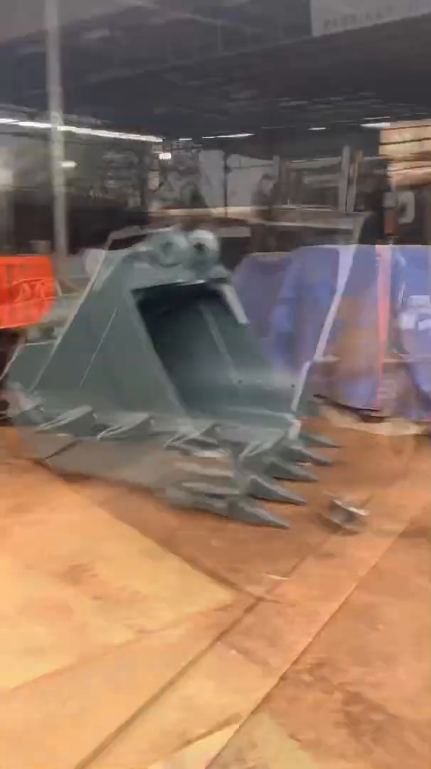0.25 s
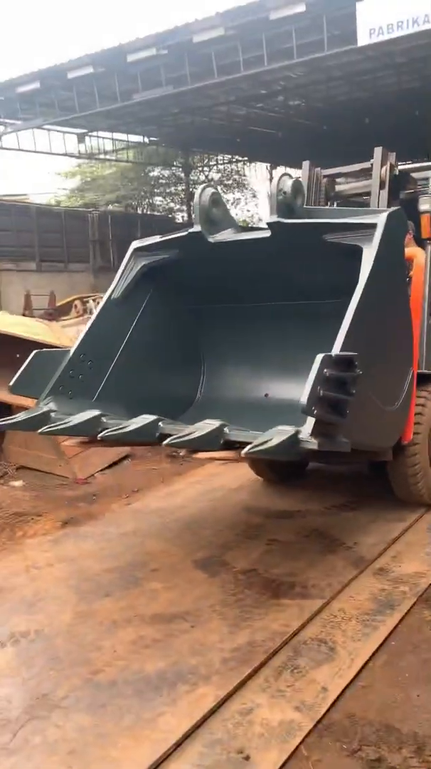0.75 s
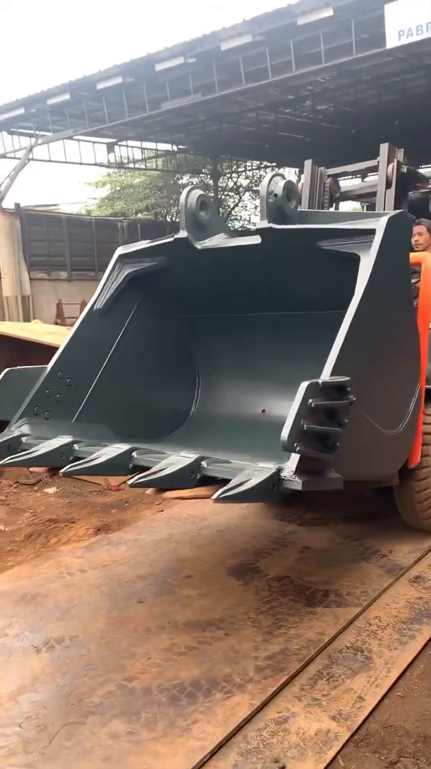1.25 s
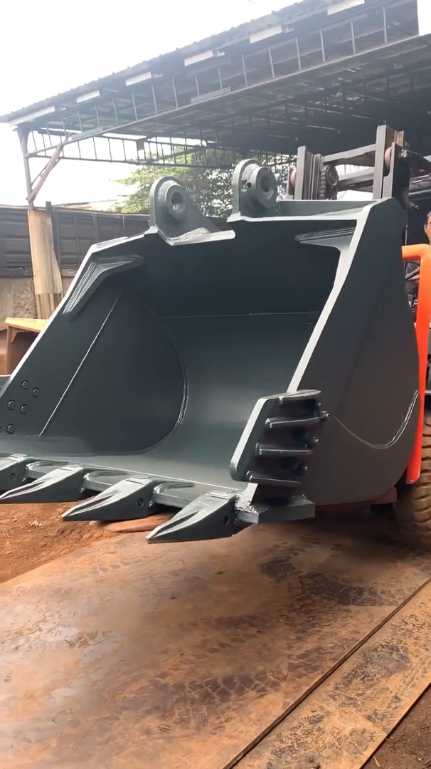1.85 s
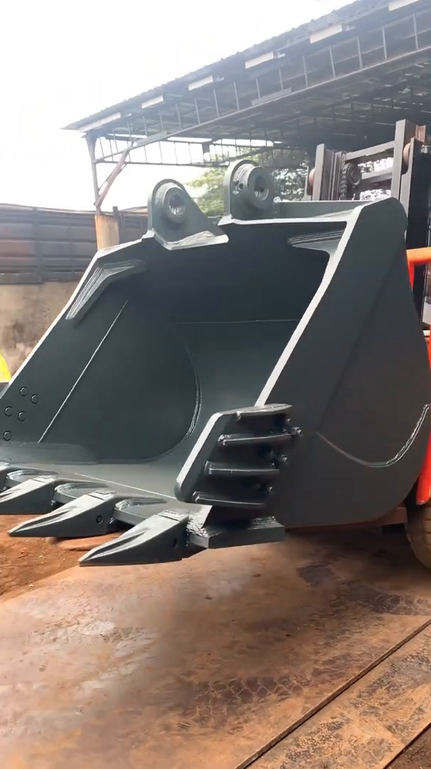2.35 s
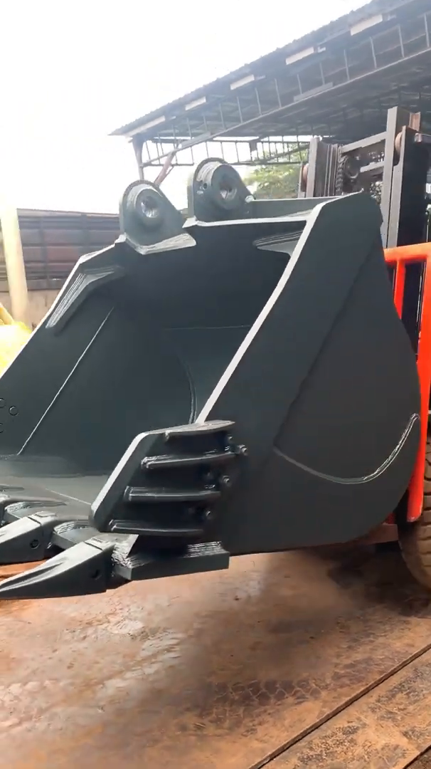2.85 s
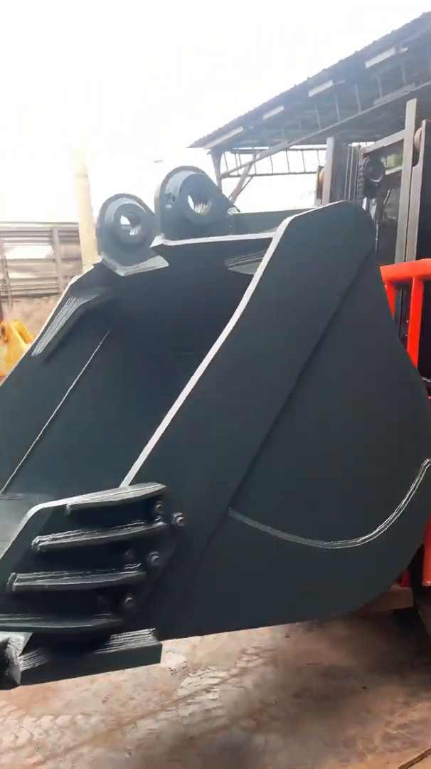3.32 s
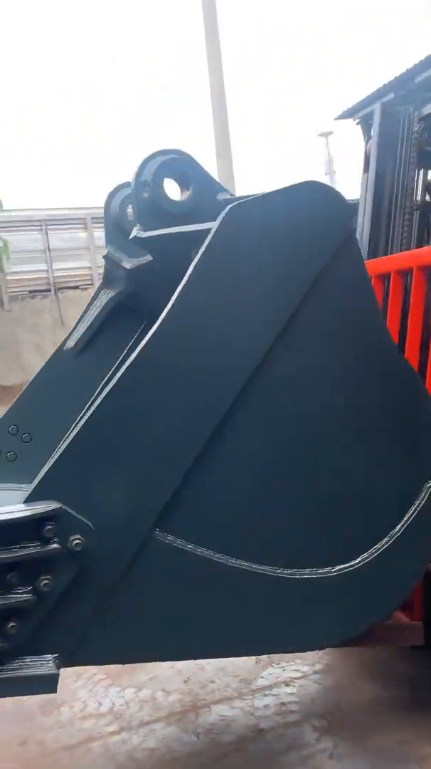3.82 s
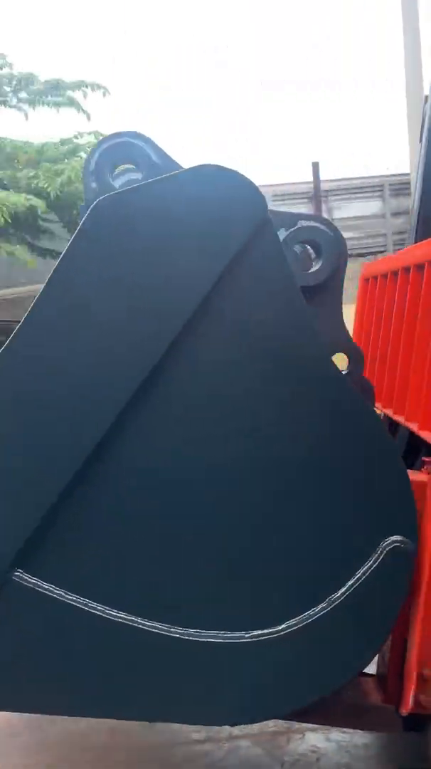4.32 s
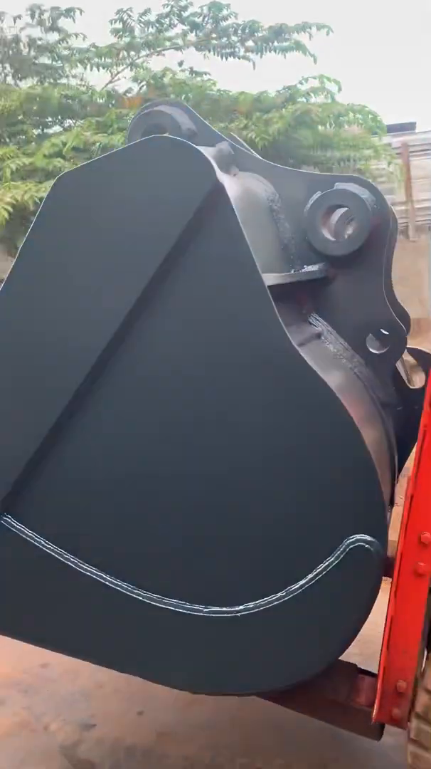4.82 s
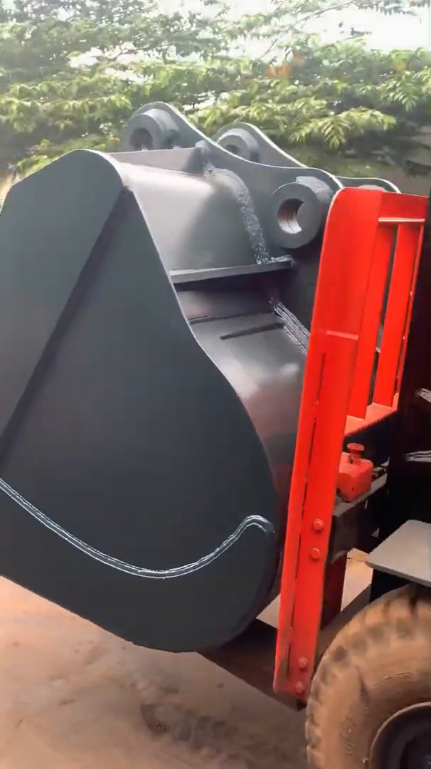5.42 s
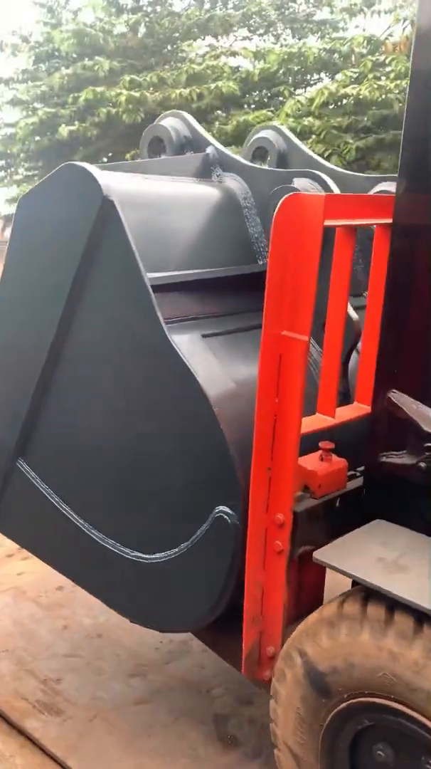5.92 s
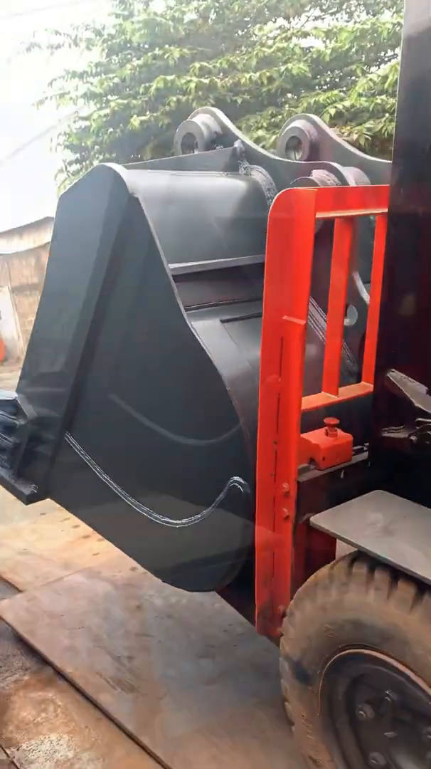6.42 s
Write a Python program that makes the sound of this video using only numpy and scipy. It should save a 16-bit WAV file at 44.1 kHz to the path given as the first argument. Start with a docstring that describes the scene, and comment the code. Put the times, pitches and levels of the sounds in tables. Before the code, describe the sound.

A diesel forklift clatters and drones steadily through a workshop yard, floor plates slapping underneath while a heavy steel load rattles, groans and clanks hard.

```python
"""A diesel forklift drives past in a workshop yard, carrying a steel excavator bucket on its forks.
Noise shaken by each firing makes the engine clatter; tones at its even orders make the exhaust drone.
Loose floor plates slap and boom under the tyres as decaying partials and a sagging note.
The bucket chatters in noise bursts, clangs in steel modes, groans on the forks and slips in brief tones.
Two microphone ports hear it, with the short answer of a tin roof and walls around the blows."""
import sys
import numpy as np
from scipy import signal
from scipy.fft import rfft, irfft, next_fast_len
from scipy.io import wavfile
from scipy.ndimage import uniform_filter1d, map_coordinates

SR = 44100
rng = np.random.default_rng(int(sys.argv[2]) if len(sys.argv) > 2 else 0)


def put_to_file(sound):
    """Save the sound as 16-bit audio at rate SR, in the file named by the first command-line argument."""
    columns = np.atleast_2d(sound).T  # one column per channel
    safe = np.clip(columns, -1, 1)
    whole_steps = np.round(safe * 32767)
    wavfile.write(sys.argv[1], SR, whole_steps.astype(np.int16))


N = 294147


def amp(db):
    """Decibels to gain."""
    return 10 ** (np.asarray(db) / 20)


def unit(x):
    """Scale to rms 1."""
    return x / np.sqrt(np.mean(x ** 2) + 1e-20)


def along(points, hz):
    """Read (Hz, value) points on a log frequency axis."""
    f, v = np.transpose(points)
    return np.interp(np.log(hz + 1), np.log(f + 1), v)


def curves(rows):
    """One value per sample for each column after the time."""
    s, *cols = np.transpose(rows)
    return [np.interp(np.arange(N) / SR, s, c) for c in cols]


def wobble(rate):
    """A smooth random curve, rate knots a second."""
    knots = rng.standard_normal(int(N * rate / SR) + 4)
    return map_coordinates(knots, [np.arange(N) * rate / SR])


def swell(s, length, rise, fall):
    """An envelope from 0 to 1: it rises from time s, holds, and falls once its length is over."""
    t = np.arange(N) / SR - s
    return np.clip(t / rise, 0, 1) * np.clip(1 - (t - length) / fall, 0, 1)


def filtered(x, response):
    """x times a complex response of frequency."""
    size = next_fast_len(N + SR // 2)
    return irfft(rfft(x, size) * response(np.fft.rfftfreq(size, 1 / SR)), size)[..., :N]


def coloured(spectrum, gate=1):
    """Gated noise of rms 1 with the given spectrum."""
    noise = gate * rng.standard_normal(N)
    return unit(filtered(noise, lambda hz: amp(along(spectrum, hz))))


def tone(hz):
    """A sine of rms 1 that follows a pitch curve."""
    return np.sqrt(2) * np.sin(2 * np.pi * (np.cumsum(hz) / SR + rng.random()))


def narrow(hz, width):
    """A fuzzy resonance of rms 1: random sidebands around a pitch curve."""
    phase = 2 * np.pi * np.cumsum(hz) / SR
    return unit(wobble(width) * np.cos(phase) + wobble(width) * np.sin(phase))


def shimmer(x, depth_db):
    """Echoes between steel sheets raise narrow peaks that drift, drawn here as a smoothed random field."""
    z = signal.stft(x, nperseg=2048)[2]
    across_pitch = uniform_filter1d(rng.standard_normal(z.shape), size=2, axis=0)
    field = uniform_filter1d(across_pitch, size=18, axis=1)
    return unit(signal.istft(z * amp(depth_db * unit(field)), nperseg=2048)[1][:N])


def add(track, s, sound):
    """Mix a sound into a track at time s."""
    part = track[round(s * SR):][:len(sound)]
    part += sound[:len(part)]


# Decay of the roof and walls. Each row: frequency in Hz, time to fall by 60 dB in seconds.
YARD_DECAY = [(100, 0.58), (1000, 0.28), (4000, 0.059), (14000, 0.1)]


def yard(x):
    """The diffuse answer of roof and walls: decaying noise whose fall time depends on pitch."""
    hz, t, z = signal.stft(rng.standard_normal(SR // 2), SR, nperseg=256)
    t60 = along(YARD_DECAY, hz)[:, None]
    fading = z * amp(-60 * t / t60) / np.sqrt(t60)  # evens out the energy of long and short decays
    tail = signal.istft(fading, SR, nperseg=256)[1]
    return signal.fftconvolve(x, unit(tail) / np.sqrt(len(tail)))[:N]


HUM_HZ, HUM_DB = 64.5, -39.5  # between its swells
PUMP_HZ = 1552
SWELL_RISE_S, SWELL_FALL_S = 0.05, 0.3
# The low hum swells. Each row: start in seconds, length in seconds, gain in dB.
HUM_SWELLS = [(0.601, 1.33, 7.5), (2.152, 0.29, 12.5), (3.049, 0.14, 11.5), (3.36, 0.34, 6.5),
              (4.2, 0.24, 5), (5.1, 1.1, 3)]
# A tone beside the hum makes it throb. Each row: start in seconds, length in seconds, level in dB, pitch in Hz.
THROBS = [(1.661, 0.38, -34.5, 73), (5.15, 0.5, -36, 75.8)]
# The hydraulic pump whines. Each row: start in seconds, length in seconds, level in dB.
PUMP_RUNS = [(.42, 1.64, -40), (5.769, 0.27, -33.5)]


def hums():
    """A low hum beats with neighbouring tones over soft rumbling noise; the pump is a thin resonance."""
    span = lambda s, length: swell(s, length, SWELL_RISE_S, SWELL_FALL_S)
    hum_db = HUM_DB + sum(db * span(s, length) for s, length, db in HUM_SWELLS)
    hum = amp(hum_db + 0.63 * wobble(9.7)) * tone(HUM_HZ * (1 + 0.0033 * wobble(5.0)))
    throb = sum(amp(db) * span(s, length) * tone(np.full(N, hz)) for s, length, db, hz in THROBS)
    rumble_spectrum = [(20, -35), (40, -34), (52, -8), (75, -2), (110, -3.0), (250, -24), (700, -90)]
    rumble = amp(-43.5 + 4.5 * wobble(2.94)) * coloured(rumble_spectrum)
    pump_level = sum(amp(db) * span(s, length) for s, length, db in PUMP_RUNS)
    whine = pump_level * narrow(np.full(N, PUMP_HZ), width=50)
    return hum + throb + rumble + whine


FLANK_S, FLANK_TURN_S = 4.73, 0.56  # middle of the turn, and its time scale


def flank():
    """From 0 to 1 as the side of the truck comes round to the microphone."""
    return .5 + .5 * np.tanh((np.arange(N) / SR - FLANK_S) / FLANK_TURN_S)


SOFTEN_S, SOFTEN_LENGTH_S = 6.09, 0.28


def softened():
    """From 0 to 1 as the truck moves past and the engine sound softens."""
    return np.clip((np.arange(N) / SR - SOFTEN_S) / SOFTEN_LENGTH_S, 0, 1)


DIP_S, DIP_LENGTH_S, DIP_FALL_S, DIP_RECOVER_S = 4.593, 0.23, 0.14, 0.17


def dip():
    """From 0 to 1 and back while the level dips briefly after the last clank."""
    return swell(DIP_S, DIP_LENGTH_S, DIP_FALL_S, DIP_RECOVER_S)


# How hard the engine works. Each row: time in seconds, level change in dB.
LOAD = [(0, -3), (.34, -3.5), (.7, -1), (1.4, -1), (1.76, 1.4), (2.05, -1), (2.37, 1.5), (2.75, -0.5),
        (3.1, -2), (3.42, 3), (4, -1), (4.45, 3), (5, -1), (5.2, 1), (5.5, 0), (5.95, 2), (6.35, -1),
        (6.67, 0.5)]


def working_db(flank_db, dip_db, load_share=1):
    """A layer's level change with the load, the passing flank and the brief dip."""
    return load_share * curves(LOAD)[0] + flank_db * flank() + dip_db * dip()


# Layer levels in dB before the changes of working_db and softened.
BODY_DB, CLATTER_DB, FAN_DB, HISS_DB = -25.5, -25.5, -39.5, -41
# What the turned flank, the dip and the softening at the end add, in dB.
FLANK_BODY_DB, FLANK_CLATTER_DB, FLANK_FAN_DB, FLANK_HISS_DB = -3, -0.35, 4, 1.7
DIP_BODY_DB, DIP_CLATTER_DB, DIP_HISS_DB = -10, -3, -7.5  # the fan dips with the clatter
SOFTEN_BODY_DB, SOFTEN_CLATTER_DB, SOFTEN_HISS_DB = -2, -2.5, -.7
# Spectrum of the hiss. Each row: frequency in Hz, density in dB per Hz.
AIR = [(20, -14), (1000, -14), (4000, -27), (6000, 3.5), (8000, 5), (10500, 1.5), (15000, 3.5), (16000, 0)]


def hiss():
    """Coloured noise with a fast flutter: a faint hiss above the engine."""
    level_db = HISS_DB + working_db(FLANK_HISS_DB, DIP_HISS_DB, load_share=0.17) + SOFTEN_HISS_DB * softened()
    return amp(level_db + 0.85 * wobble(13.0)) * coloured(AIR, gate=amp(1.3 * wobble(250)))


def fan():
    """The cooling fan whooshes in one broad resonance."""
    fan_hz = 650
    level_db = FAN_DB + working_db(FLANK_FAN_DB, DIP_CLATTER_DB)
    return amp(level_db + wobble(6.3)) * narrow(np.full(N, fan_hz), width=220)


BOOM_HZ, BOOM_SAG_HZ_PER_S = 175.4, 53  # starting pitch and its fall
BOOM_DELAY_S, BOOM_RISE_S, BOOM_HOLD_S, BOOM_FALL_S = .01, 0.02, 0.049, 0.0065  # hold includes the rise
BOOM_TAIL_DB, BOOM_TAIL_T60_S = -6, 0.78
PLATE_RING_HZ, PLATE_RING_DB, PLATE_RING_T60_S = 522, -13.5, 1.4  # a faint after-ring, re the boom
# The plate buzzes against the ground as it bends. Each row: multiple of the boom, level in dB.
BOOM_PARTIALS = [(1, 0), (2, -15.5), (3, -15), (4, -19)]
# Plates rock under a tyre. Each row: start in seconds, slap level in dB, slap pitch in Hz, boom level in dB.
PLATES = [(.381, -9.5, 502, -17.5), (.877, -11, 510, -16), (4.243, -13.5, 344, -31),
          (4.828, -15.5, 423, -35), (5.225, -17, 431, -34)]


def plates():
    """A plate slaps down with a gritty knock, booms and buzzes until the tyre pins it, and leaves a tail."""
    out, t = np.zeros(N), np.arange(SR // 2) / SR
    slap_partials = [(.64, -6), (1, 2.5), (2.2, -3), (2.9, -8.5)]  # (multiple of the slap pitch, dB)
    grit_spectrum = [(90, -31), (200, -10.0), (500, -2.0), (800, 0.5), (1800, -0.5), (3500, -40.0)]
    for s, slap_db, hz, boom_db in PLATES:
        knock = sum(amp(db) * np.sin(2 * np.pi * hz * ratio * t) for ratio, db in slap_partials)
        grit = coloured(grit_spectrum)[:len(t)]
        slap = knock * amp(-60 * t / 0.079) + 0.32 * grit * amp(-60 * t / 0.24)
        slap = slap * (1 - np.exp(-t / 0.003))
        bend = swell(BOOM_DELAY_S, BOOM_HOLD_S, BOOM_RISE_S, BOOM_FALL_S)[:len(t)]
        tail = amp(BOOM_TAIL_DB - 60 * t / BOOM_TAIL_T60_S) * (1 - np.exp(-t / 0.022))
        phase = 2 * np.pi * (BOOM_HZ - BOOM_SAG_HZ_PER_S * t / 2) * t + 0.23 * wobble(95)[:len(t)]
        buzz = sum(amp(db) * np.sin(k * phase + 2 * np.pi * rng.random()) for k, db in BOOM_PARTIALS)
        boom = buzz * (bend + tail) * amp(1.2 * wobble(108)[:len(t)])
        ring = np.sin(2 * np.pi * PLATE_RING_HZ * t) * amp(PLATE_RING_DB - 60 * t / PLATE_RING_T60_S)
        add(out, s, amp(slap_db) * slap + amp(boom_db) * (boom + ring))
    return out


GROAN_RISE_S, GROAN_FALL_S = 0.032, .1
GROAN_WAVER, GROAN_TONE_DB = .013, -3  # wander as a share of the pitch; clear tone re the rough part
# The load groans on the forks. Each row: start in seconds, length in seconds, level in dB,
# starting pitch in Hz, roughness width in Hz, sag in Hz per second.
GROANS = [(3.356, 0.13, -32, 441, 47, 3), (3.563, 0.17, -30, 373, 30.05, 23),
          (3.8, 0.16, -33.5, 365, 35.9, 27), (4.04, 0.13, -29, 365, 51.06, 57),
          (4.216, 0.18, -23.5, 348, 36, 229), (4.807, .08, -29.5, 425, 70, 195)]


def groan():
    """The heavy load rubs on the forks: a rough resonance and a tone that waver and sag in pitch."""
    t, out = np.arange(N) / SR, np.zeros(N)
    waver = 1 + GROAN_WAVER * wobble(16)
    for s, length, db, hz, width, sag in GROANS:
        pitch = waver * (hz - sag * np.clip(t - s, 0, length + GROAN_FALL_S))
        voice = unit(narrow(pitch, width) + amp(GROAN_TONE_DB) * tone(pitch))
        out += amp(db) * swell(s, length, GROAN_RISE_S, GROAN_FALL_S) * voice
    return out


CLANK_SCRAPE_DB, RATTLE_SCRAPE_DB = -14, -26.5  # re the blow
# The bucket clanks hard on the forks and rebounds. Each row: time in seconds, blow level in dB,
# thud trim in dB, crack level in dB, ring level in dB, pitch that rings most in Hz.
CLANKS = [(2.595, -9.5, -3, -20, -14.5, 2833), (2.645, -15, 0, -40, -31, 2460),
          (3.602, -8, -11, -22, -23, 1340), (3.644, -14.5, -10, -38, -25, 1350),
          (4.444, -5.5, -8, -21, -22.5, 1250), (4.489, -11.5, -7, -40, -22, 917),
          (4.556, -8, -13, -35, -17, 876), (4.592, -11, -20, -42, -18, 2500)]
# The bucket knocks loosely over bumps. Each row: time in seconds, blow level in dB,
# thud trim in dB, ring level in dB, pitch that rings most in Hz.
RATTLES = [(.765, -13.5, -21, -35, 2600), (.8, -13.5, -21, -31, 2603), (.838, -13, -12, -28, 2480),
           (1.248, -26, -3, -29, 1213), (3.205, -26, -10, -38, 2480), (3.24, -13.5, -7, -26.5, 2480),
           (3.266, -11, -2, -25, 790), (3.306, -17, -8, -25, 2480), (3.345, -13.5, 0, -23, 820),
           (3.372, -10, -15, -23, 2950), (3.405, -16, 1, -33, 820), (3.438, -16, -6, -25, 1350),
           (3.473, -26, 1, -38, 820), (3.524, -15, -1.5, -23, 2460), (3.549, -15, -4, -28, 2480),
           (4.252, -11.5, -3, -34, 2500), (4.388, -15.5, -2, -26, 1450), (4.826, -16, -4, -40, 2500),
           (4.863, -16.5, -7, -29, 2500), (5.116, -15, 0, -29.5, 1370)]


def contacts():
    """Every touch of bucket and forks: (s, blow dB, thud trim dB, scrape dB)."""
    return ([(s, db, thud_db, CLANK_SCRAPE_DB) for s, db, thud_db, *_ in CLANKS]
            + [(s, db, thud_db, RATTLE_SCRAPE_DB) for s, db, thud_db, *_ in RATTLES])


def strikes():
    """The blows that ring the shell: (s, ring dB, Hz that rings most)."""
    return [(s, db, hz) for s, *_, db, hz in CLANKS + RATTLES]


IMPACTS_PER_S, IMPACT_SPREAD_DB, IMPACT_DECAY_S = 260, 1, .003
IMPACT_RUB = 0.53  # power of the rub re the mean power of the impacts


def hail():
    """The envelope, of rms 1, of irregular tiny impacts over a steady rub."""
    spread_db = IMPACT_SPREAD_DB * np.clip(rng.standard_normal(N), -1.5, 1.5)
    hits = (rng.random(N) < IMPACTS_PER_S / SR) * amp(spread_db) ** 2
    power = signal.lfilter([1], [1, -np.exp(-1 / (IMPACT_DECAY_S * SR))], hits)
    return unit(np.sqrt(power / power.mean() + IMPACT_RUB))


CONTACT_SHIMMER_DB = 3.5
# Spectra of steel contact, dull thud and bright scrape. Each row: frequency in Hz, density in dB per Hz.
CONTACT = [(100, -36), (400, -13), (850, 2.5), (1250, -3.5), (1700, -2), (2700, -4), (3300, -5.5),
           (4200, -12), (6200, -19), (9000, -23.5), (16000, -44)]
THUD = [(40, -32), (90, 9.5), (230, 6.5), (380, 10.5), (600, 0.5), (1500, -46)]
SCRAPE = [(1500, -30), (3000, 8), (6200, 16.5), (9000, 8.5), (15500, -22)]


def chatter():
    """The bucket lands on the forks in bursts of contact, thud and scrape noise that die away."""
    t = np.arange(SR // 2) / SR
    burst = lambda t60, rise: (1 - np.exp(-t / rise)) * amp(-60 * t / t60)
    contact, thud, scrape = np.zeros((3, N))  # powers, so that overlapping bursts add
    for s, db, thud_db, scrape_db in contacts():
        start = s - .009
        add(contact, start, (amp(db - 6.5) * burst(t60=0.27, rise=0.0069)) ** 2)
        add(thud, start, (amp(db + thud_db - 2.5) * burst(t60=0.29, rise=0.016)) ** 2)
        add(scrape, start, (amp(db + scrape_db) * burst(t60=0.24, rise=0.013)) ** 2)
    grain = hail()
    steel = shimmer(coloured(CONTACT, grain), CONTACT_SHIMMER_DB)
    landing = np.sqrt(contact) * steel + np.sqrt(thud) * coloured(THUD)
    return landing + np.sqrt(scrape) * coloured(SCRAPE, grain)


# Modes of the bucket shell. Each row: frequency in Hz, level in dB, time to fall by 60 dB in seconds
# before the forks' damping.
STEEL = [(790, -2.5, .8), (845, -5, 0.97), (878, 0, 1.2), (923, -3, 0.68), (1008, 1, 0.34),
         (1206, 2.5, 0.71), (1328, 2, 0.63), (1440, -4, .73), (1870, 1, 0.48), (2194, -1.5, 0.32),
         (2505, -2.5, .45), (2660, -4, 0.36), (2734, -2.5, 0.3), (2954, -1.5, 0.62), (3240, -5, .15),
         (4800, -23, .3), (6160, -19, .3)]


def clangs():
    """Each blow favours the modes of the spot it strikes; the forks damp and roughen the ring."""
    out, t = np.zeros(N), np.arange(SR) / SR
    damping = 0.45 + np.exp(-t / 0.02)
    for s, db, focus_hz in strikes():
        for hz, level, t60 in STEEL:
            spot_db = max(-22 * abs(np.log2(hz / focus_hz)), -13)
            # a random walk of the phase, in cycles, roughens the mode
            drift = rng.random() + 2.0 * np.cumsum(rng.standard_normal(len(t))) / np.sqrt(SR)
            decay = amp(level + spot_db + rng.normal(0, 2.0) - 60 * t / t60)
            ring = np.sin(2 * np.pi * (hz * t + drift)) * decay
            add(out, s, amp(db) * ring * damping * (1 - np.exp(-t / 0.0024)))
    return out


def cracks():
    """An edge skids for a moment and gives a bright, gritty crack of noise."""
    t = np.arange(SR // 4) / SR
    level = np.zeros(N)
    for s, _, _, db, *_ in CLANKS:
        add(level, s - .002, amp(db) * (1 - np.exp(-t / 0.0038)) * amp(-60 * t / 0.11))
    spectrum = [(1500, -12), (3000, 7), (3900, 3), (4800, -3), (6200, 13), (9000, 0), (15500, 3)]
    return level * coloured(spectrum, gate=amp(1.1 * wobble(600)))


SLIP_RISE_S, SLIP_FALL_S = 0.0056, 0.011
SLIP_ROUGHNESS, SLIP_JUDDER_HZ = 0.19, 260.4  # judder depth; its knots per second
# The bucket slips on the forks. Each row: start in seconds, length in seconds, level in dB, pitch in Hz.
SLIPS = [(.834, 0.011, -29, 2485), (2.596, .01, -26, 870), (3.27, 0.0083, -24, 824),
         (3.372, 0.028, -27.5, 830), (3.402, .016, -21.5, 438), (3.527, .012, -25, 2350),
         (3.6, 0.018, -28.5, 1323), (3.64, .02, -27, 1330), (4.448, .016, -19.5, 874),
         (4.462, 0.0088, -21.5, 1280), (4.485, 0.027, -18, 898), (4.513, 0.019, -26, 2560),
         (4.564, 0.024, -17.5, 879), (4.59, 0.0083, -21, 2490), (4.618, 0.065, -31.5, 1432)]


def slips():
    """A slip drives one mode of the shell, with a judder, and stops when the steel grips again."""
    out, t = np.zeros(N), np.arange(SR // 8) / SR
    judder = np.array([wobble(SLIP_JUDDER_HZ), wobble(SLIP_JUDDER_HZ)]) * SLIP_ROUGHNESS
    for s, length, db, hz in SLIPS:
        size, bend = judder[:, round(s * SR):][:, :len(t)]
        sing = np.sqrt(2) * (1 + size) * np.sin(2 * np.pi * (hz * t + rng.random()) + bend)
        add(out, s, amp(db) * swell(0, length, SLIP_RISE_S, SLIP_FALL_S)[:len(t)] * sing)
    return out


DRONE_FALL_S = 0.17
DRONE_OVERTONE_DB, DRONE_WAVER = -21, 0.0078  # each overtone re the note; wander as a share of the pitch
# Low notes from the loaded truck. Each row: start in seconds, length in seconds, level in dB,
# starting pitch in Hz, final pitch in Hz, rise in seconds.
DRONES = [(1.532, .06, -32, 109, 106, .05), (3.22, 0.14, -25, 92.3, 98.7, 0.042),
          (3.36, 0.276, -29.5, 156.7, 147.8, .05), (3.66, 0.207, -35, 147.3, 139.3, .05),
          (3.743, 0.49, -36, 211.3, 211.4, 0.06), (4.15, 0.35, -31.5, 110.1, 105.3, 0.045),
          (4.739, 0.61, -36, 108.3, 113, 0.046), (4.804, 0.27, -33, 166, 166.5, 0.067),
          (5.1, 0.46, -24, 168.5, 166.8, 0.16), (5.59, 0.15, -33, 166.6, 175.6, .05),
          (5.67, 0.55, -24, 118.4, 116.8, 0.085), (5.881, 0.44, -32.5, 141, 136, .05),
          (6.22, 0.63, -25.5, 98, 94.3, 0.27)]


def drones():
    """Each low note swells, holds or glides a little, and fades, wavering under faint overtones."""
    out = np.zeros(N)
    waver = 1 + DRONE_WAVER * wobble(22)
    for s, length, db, start_hz, final_hz, rise in DRONES:
        level = amp(db) * swell(s, length, rise, DRONE_FALL_S)
        on = level > 0
        pitch = curves([(s, start_hz), (s + length, final_hz)])[0] * waver
        phase = 2 * np.pi * (np.cumsum(pitch[on]) / SR + rng.random())
        overtones = amp(DRONE_OVERTONE_DB) * sum(np.sin(k * phase) for k in range(2, 5))
        out[on] += np.sqrt(2) * level[on] * (np.sin(phase) + overtones)
    return out * amp(0.57 * wobble(25))


# Engine speed. Each row: time in seconds, firings per second.
SPEED = [(0, 69), (.5, 62.3), (.8, 62.6), (1.3, 64.6), (1.5, 62), (2.15, 65), (2.45, 62.8), (3.15, 60.8),
         (3.7, 63.4), (4.4, 63.5), (5.5, 61), (6.1, 60), (6.67, 61)]
# Strength of the exhaust drone. Each row: time in seconds, level in dB.
EXHAUST = [(0, -33.5), (.35, -44), (.5, -25.5), (.8, -26), (1.03, -30.5), (1.3, -30.5), (1.5, -44),
           (2.1, -44), (2.27, -30.5), (3.03, -31), (3.3, -45), (5, -40), (6.67, -37)]
# The pipe's even orders. Each row: multiple of the firing rate, level in dB re the drone.
PIPE_ORDERS = [(2, 0), (4, -7), (6, -10.5), (8, -9.5)]


def exhaust():
    """The pipe sounds the even orders of the firing rate, with faint fuzzy odd ones between."""
    speed = curves(SPEED)[0] * (1 + 0.006 * wobble(12))
    drone_db = curves(EXHAUST)[0]
    odd_db = BODY_DB + working_db(FLANK_BODY_DB, DIP_BODY_DB) - 17.0
    even = sum(amp(drone_db + db + 1.8 * wobble(13)) * tone(k * speed) for k, db in PIPE_ORDERS)
    odd = sum(amp(odd_db + 0.45 * wobble(3.0)) * narrow(k * speed, width=10) for k in range(5, 10, 2))
    return even + odd


CLATTER_SHIMMER_DB = 2.7
# Resonances of engine cover and chassis. Each row: frequency in Hz, width in Hz, level in dB.
PANELS = [(107, 46.4, -0.5), (164, 37, 2), (225, 44, 2.5), (345, 50, -1.5), (382, 35, 0), (448.3, 31.5, -2),
          (518, 43, -6.5), (703, 93, -8.5), (909, 33, -7.5)]
# Spectrum of the engine's clatter. Each row: frequency in Hz, density in dB per Hz.
CLATTER = [(150, -12), (400, -2.5), (800, 4), (1250, 2.5), (1900, -0.5), (2600, 0.5), (3500, -7),
           (5000, -13.5), (7000, -19.5), (10000, -27.5), (16000, -38)]


def panel_response(f):
    """Cover and chassis resonate in modes of alternating sign; the lowest bass is cut."""
    modes = sum((-1) ** k * amp(db) * 1j * f * w / (c * c - f * f + 1j * f * w)
                for k, (c, w, db) in enumerate(PANELS))
    return modes * f ** 4 / (f ** 4 + 56 ** 4)


def engine():
    """Each firing shakes the panels and ticks in the block: noise gated by decaying pulses."""
    body_db = BODY_DB + working_db(FLANK_BODY_DB, DIP_BODY_DB) + SOFTEN_BODY_DB * softened()
    clatter_db = CLATTER_DB + working_db(FLANK_CLATTER_DB, DIP_CLATTER_DB) + SOFTEN_CLATTER_DB * softened()
    firings = np.cumsum(curves(SPEED)[0]) / SR
    index = firings.astype(int)
    # the four cylinders are unequal, and no two firings are alike
    cylinder_db = np.array([-0.8, -4.0, -3.5, -4.5])[index % 4]
    strength = amp(cylinder_db + 1.0 * rng.standard_normal(1000)[index])
    blow = strength * np.exp(-(firings % 1) / 0.54)
    # the valves tick twice per firing
    tick_db = 2 * rng.standard_normal(2000)[(2 * firings).astype(int)]
    valves = amp(tick_db) * np.exp(-(2 * firings % 1) / 0.1)
    shaken = filtered((0.45 + blow) * rng.standard_normal(N), panel_response)
    body = shimmer(shaken, depth_db=2.0)
    clatter_gate = (1.2 + 0.35 * blow + 0.41 * valves) * amp(1.35 * wobble(220))
    clatter = shimmer(coloured(CLATTER, gate=clatter_gate), CLATTER_SHIMMER_DB)
    return amp(body_db + 0.91 * wobble(10)) * body + amp(clatter_db + 0.88 * wobble(18)) * clatter


# Likeness of the two microphone ports. Each row: frequency in Hz, likeness from 0 to 1.
ALIKE = [(150, .998), (450, 0.93), (620, 0.75), (850, 0.5), (1650, 0.24), (2600, 0.81), (3300, 0.21),
         (4900, 0.74), (6400, 0.34), (7800, 0.99), (9500, 0.35), (11500, 1), (15000, 1)]
# Phase between the ports. Each row: frequency in Hz, radians by which the right leads.
LEAD = [(600, 0), (780, 1.04), (1000, 4), (1300, 4.5), (1800, 6.5), (2900, 7), (3600, 2), (5200, 3.5),
        (6200, 5), (7200, 3), (8500, 3.5), (11000, -1)]


def scene():
    """The diffuse yard sets the ports apart; the left is shifted by LEAD, the slips come from straight ahead."""
    running = lambda: engine() + fan() + hiss() + groan()  # drawn afresh for mid and side
    blows = chatter() + clangs() + cracks() + plates()
    singing = slips()
    turn = lambda hz: np.arccos(np.clip(along(ALIKE, hz), 0, 1)) / 2
    direct = running() + exhaust() + drones() + hums() + blows
    diffuse = running() + yard(blows + amp(-15) * singing)
    mid = filtered(direct, lambda hz: np.cos(turn(hz)))
    side = filtered(diffuse, lambda hz: np.sin(turn(hz)))
    left = filtered(mid + side, lambda hz: np.exp(-1j * along(LEAD, hz)))
    return np.array([left, mid - side]) + singing


TOP_HZ = 15800
# Level balance of the ports. Each row: frequency in Hz, left minus right in dB.
BALANCE_DB = [(60, -1.5), (130, -2), (280, -5), (1600, -4.5), (2500, 0), (15000, 0)]


def record(dry):
    """The ports differ in level; peaks are rounded off and nothing passes above the band limit."""
    heard = filtered(dry, lambda hz: amp(np.outer([1, -1], along(BALANCE_DB, hz)) / 2))
    rounded = heard / (1 + (heard / .9) ** 6) ** (1 / 6)
    return filtered(rounded, lambda hz: hz < TOP_HZ)


dry = scene()
out = record(dry)
put_to_file(out)
```